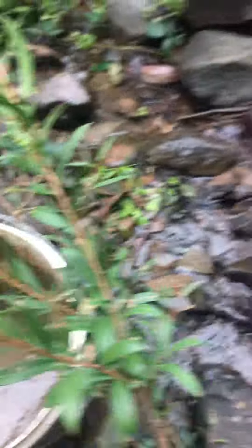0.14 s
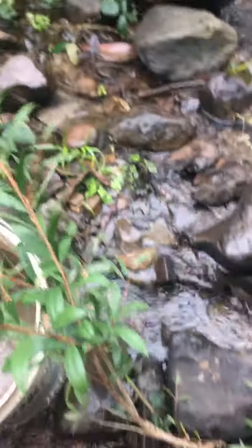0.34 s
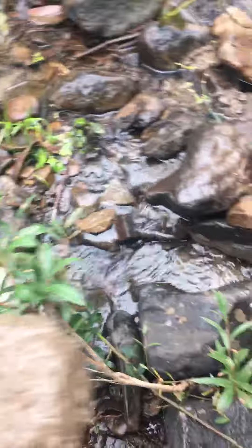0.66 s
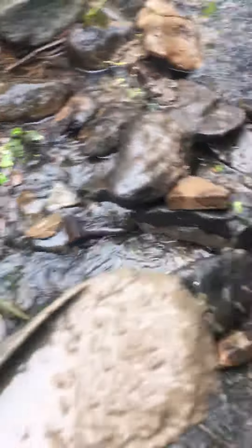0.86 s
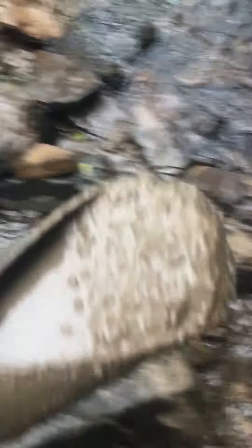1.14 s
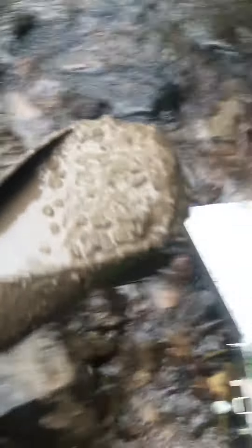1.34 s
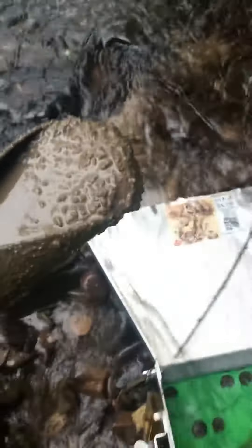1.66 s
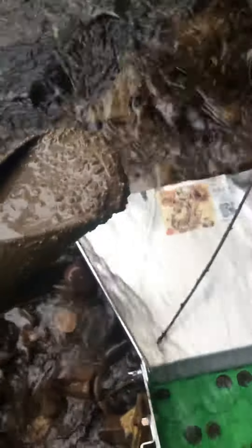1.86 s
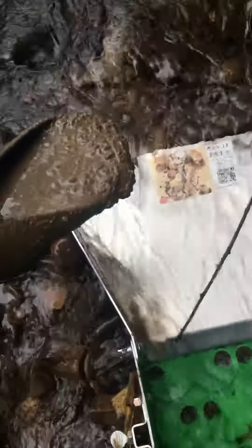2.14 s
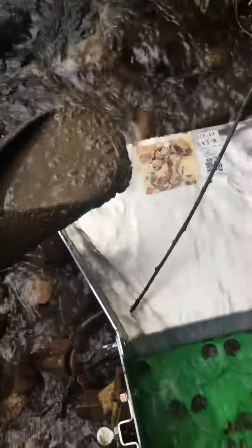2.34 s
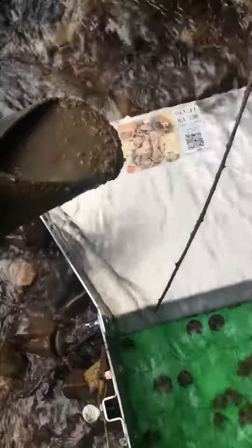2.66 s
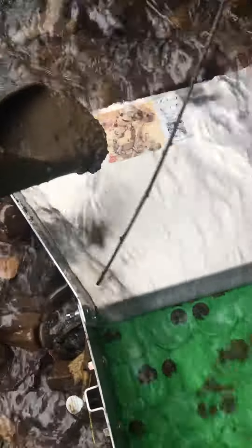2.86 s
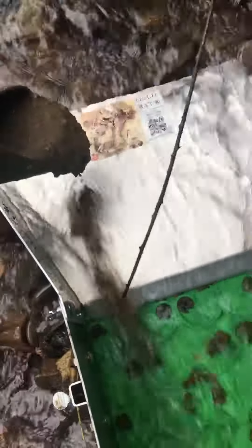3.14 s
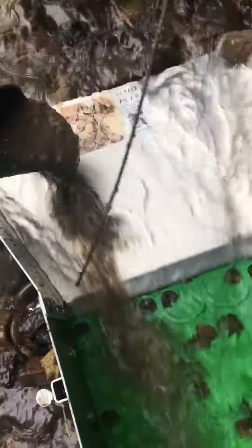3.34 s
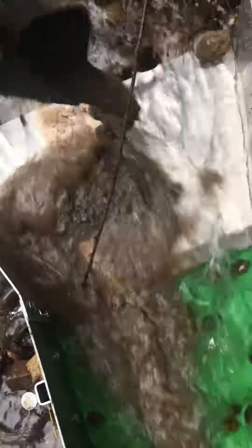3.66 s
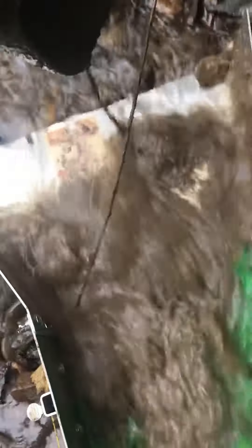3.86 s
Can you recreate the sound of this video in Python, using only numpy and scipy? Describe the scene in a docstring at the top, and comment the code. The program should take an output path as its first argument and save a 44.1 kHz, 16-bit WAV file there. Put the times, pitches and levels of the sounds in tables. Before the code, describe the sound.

A shallow stream gurgles and hisses over rocks outdoors, with bubbles and sharp droplets, growing louder as the close microphone nears a sluice tray; near the end wet gravel splatters and knocks onto it.

```python
"""By a rocky stream, close up: a rush of water, louder as the microphone nears a sluice tray.
Shaped noise makes the rush and hiss, fading rising tones the bubbles, short noise bursts the droplets.
A low rumble and a wavering low tone lie underneath. The hollow tray hums: noise through resonances.
Near the end wet gravel is tipped onto the tray: it splatters, hisses and knocks it."""
import sys
import numpy as np
from scipy import signal
from scipy.fft import rfft, irfft, next_fast_len
from scipy.io import wavfile
from scipy.ndimage import uniform_filter1d, map_coordinates

SR = 44100
rng = np.random.default_rng(int(sys.argv[2]) if len(sys.argv) > 2 else 0)


def generate_wav(sig):
    """Save sig (samples, or channels by samples) to the path in sys.argv[1] as 16-bit PCM at SR."""
    pcm = np.round(np.clip(np.atleast_2d(sig).T, -1, 1) * 32767).astype(np.int16)
    wavfile.write(sys.argv[1], SR, pcm)


def decibels_to_gain(level_db):
    """Convert a level in decibels to a linear amplitude gain (20 dB per decade)."""
    exponent = np.asarray(level_db, float) / 20
    return 10 ** exponent


N = 176400  # samples: 4 s

# Strength of the stream, before each layer's own offset:
# (time [s], gurgle level [dB], spray level [dB])
STREAM_LEVELS = [(0, -49.5, -52.5), (2.5, -45.5, -47.5), (3.3, -46.5, -44), (4, -42, -36.5)]
# Tone colour of the water rushing over stones: (frequency [Hz], relative power per Hz [dB])
GURGLE_SPECTRUM = [(180, -55), (300, -17), (405, -1.5), (502, -19), (613, -1.5), (1380, -3.5), (2860, -5),
                   (4910, -15), (6000, -47), (7800, -84)]
# Tone colour of the fine hiss: (frequency [Hz], relative power per Hz [dB])
SPRAY_SPECTRUM = [(1760, -9.5), (3000, 1.5), (4940, -10), (5990, 2.5), (7480, -4.5), (10400, -4),
                  (14600, 3.5), (16000, -3), (16500, -43)]
# Tone colour of the low rumble: (frequency [Hz], relative power per Hz [dB])
RUMBLE_SPECTRUM = [(20, -43), (36, -8), (75, 0.5), (92, -1), (113, -9.5), (140, -10), (200, -14.5),
                   (260, -55), (440, -120)]
# Hollow resonances of the tray, each passed through twice: (frequency [Hz], width of one pass [Hz])
TRAY_RESONANCES = [(240, 56.4), (500, 72)]
# Hum from water drumming on the tray: (time [s], lower resonance [dB], upper resonance [dB])
TRAY_HUM_LEVELS = [(0, -63.5, -64.5), (1.6, -59, -52.5), (3.15, -60.5, -56.5), (3.25, -67, -43),
                   (3.36, -58, -56), (3.64, -57.5, -51.5), (3.71, -42.5, -66), (3.765, -71, -57),
                   (3.79, -43, -57), (3.9, -48.5, -52.5), (3.94, -57, -57)]
# Gravel blows: (time [s], click into lower resonance [dB], click into upper resonance [dB])
GRAVEL_KNOCKS = [(3.505, 7, 14.5), (3.783, 16.5, -18)]
# The clearest near bubbles: (time [s], level [dB], starting pitch [Hz], cycles per 20 dB of fading [-])
NEAR_BUBBLES = [(0.2125, -24, 1450, 11.5), (0.253, -23.5, 1230, 5.5), (0.3725, -26, 2070, 9.5),
                (0.436, -38, 1275, 18), (0.46, -31, 1180, 12), (0.679, -29.5, 2430, 12.5),
                (0.716, -30, 4220, 9), (0.818, -31.5, 1860, 16), (0.877, -34, 3810, 26),
                (0.916, -36, 2620, 16), (1.3, -29, 805, 6.5), (1.419, -33.5, 2300, 17),
                (1.555, -31.5, 2330, 17), (1.683, -35.5, 4000, 18), (1.817, -36, 1070, 25),
                (2.047, -32.5, 2760, 23), (2.261, -25, 980, 6.5), (2.294, -34, 904, 9),
                (2.342, -28, 1436, 12.5), (2.396, -26.5, 1030, 5.5), (2.625, -30.5, 5220, 25),
                (2.637, -26.5, 2650, 13.5), (2.668, -36, 1270, 13), (2.698, -40, 1033, 39),
                (2.723, -33, 1407, 27), (2.773, -33, 1030, 11), (2.837, -30.5, 4600, 18),
                (2.913, -31, 2170, 19), (2.958, -25.5, 3540, 10), (2.979, -35.5, 1350, 10),
                (2.995, -30, 1060, 14.5), (3.049, -30.5, 1515, 13), (3.182, -35, 3670, 29),
                (3.202, -36.5, 1390, 25), (3.321, -29.5, 2270, 17), (3.364, -33.5, 3310, 23),
                (3.449, -30.5, 970, 6), (3.495, -7, 2070, 7), (3.505, -24, 956, 8.5), (3.712, -19, 2590, 9),
                (3.996, -26, 3740, 17), (3.966, -28, 2170, 22)]
# The loudest droplets: (time [s], peak [dB], centre frequency [Hz])
NEAR_SPLATS = [(0.0266, -26.5, 14600), (0.0753, -22.5, 7200), (0.2113, -23, 6650), (0.2, -31, 5300),
               (0.2915, -31.5, 4640), (0.331, -30, 6600), (0.505, -29, 15400), (0.612, -25.5, 9300),
               (0.7662, -24, 14800), (0.817, -6, 14400), (0.9183, -27, 12600), (0.9311, -16.5, 10100),
               (1.074, -18, 13100), (1.12, -26.5, 4370), (1.3096, -26, 9200), (1.396, -33, 5800),
               (1.3267, -18.5, 9800), (1.458, -29, 8800), (1.4964, -23, 9300), (1.5564, -31, 12600),
               (1.6127, -21, 8750), (1.628, -14.5, 14800), (1.679, -24, 9300), (1.7144, -24, 5670),
               (1.8065, -25, 13200), (1.8348, -16, 12800), (1.857, -25, 11100), (1.8866, -23, 12700),
               (2.0847, -20, 15200), (2.177, -18, 14600), (2.2332, -24, 4900), (2.301, -24, 4200),
               (2.3356, -25, 15100), (2.4917, -24, 15300), (2.5701, -16.5, 15100), (2.6264, -13.5, 11400),
               (2.646, -22, 5470), (2.7, -22, 8200), (2.7196, -18, 4840), (2.7673, -22, 15000),
               (2.9253, -17, 11800), (3.0799, -23, 14600), (3.1276, -19, 14700), (3.144, -20, 14300),
               (3.1942, -12, 8900), (3.2161, -15, 12100), (3.262, -15.5, 15100), (3.3022, -26, 10000),
               (3.344, -14, 13900), (3.4333, -16.5, 10700), (3.474, -10, 13400), (3.505, -4.5, 6700),
               (3.5402, -8.5, 12800), (3.6106, -17.5, 7150), (3.6591, -28, 14700), (3.7801, -4, 11600),
               (3.7874, -14, 15100), (3.807, -10, 13900), (3.819, -9, 9900), (3.851, -14, 15000),
               (3.865, -17.5, 6550), (3.8688, -9, 13300), (3.875, -16, 9100), (3.89, -15, 9450),
               (3.931, -11.5, 9600), (3.9659, -22, 14000), (3.987, -14, 14100)]
# Broad splashes, short slaps of water and one long high fizz:
# (time [s], peak [dB], centre frequency [Hz], time to fade 60 dB [s])
BROAD_SPLASHES = [(0.2117, -26, 2200, 0.022), (0.2537, -28, 1760, 0.0095), (0.3722, -36, 1400, 0.01),
                  (0.622, -29, 13000, 0.26), (1.556, -23.5, 3200, 0.005), (3.506, -24.5, 816, 0.035),
                  (3.968, -28, 2000, 0.033)]
# Slurry landing on the tray, before each layer's own changes: (time [s], level [dB])
POUR_LEVELS = [(3.15, -53), (3.3, -55), (3.46, -44), (3.5, -33.5), (3.56, -39), (3.6, -43.5), (3.77, -43),
               (3.785, -33.5), (3.825, -32), (3.845, -37), (3.879, -26.5), (3.91, -54), (4.0, -41)]


def unit(x):
    """Scales a sound to an average (rms) strength of 1."""
    return x / np.sqrt(np.mean(x ** 2) + 1e-20)


def along(points, hz):
    """Reads a curve of (frequency, value) points on a log frequency axis."""
    f, value = np.transpose(points)
    return np.interp(np.log(hz + 1), np.log(f + 1), value)


def curves(rows):
    """Gives one value per sample for each column after the time."""
    s, *columns = np.transpose(rows)
    return [np.interp(np.arange(N) / SR, s, column) for column in columns]


def wobble(rate):
    """Draws a smooth random curve with rate random points a second."""
    points = rng.standard_normal(int(N * rate / SR) + 400)
    return map_coordinates(points, [np.arange(N) * rate / SR])


def filtered(x, response):
    """Multiplies the spectrum of x by a response, a function of frequency."""
    m = next_fast_len(N + SR // 2)  # room for ringing after the end
    return irfft(rfft(x, m) * response(np.fft.rfftfreq(m, 1 / SR)), m)[..., :N]


def rush(spectrum, patchy_db, wide=6, long=6):
    """Makes noise of rms 1 with patches of random gain, wide in frequency and long in time."""
    z = signal.stft(rng.standard_normal(N), nperseg=256)[2]
    patches = uniform_filter1d(rng.standard_normal(z.shape), size=wide, axis=0)
    patches = uniform_filter1d(patches, size=long, axis=1)
    x = signal.istft(z * decibels_to_gain(patchy_db * unit(patches)), nperseg=256)[1][:N]
    return unit(filtered(x, lambda hz: decibels_to_gain(along(spectrum, hz))))


def laid(s, grains):
    """Adds up rows of short sounds at their start times."""
    at = np.round(s * SR).astype(int)[:, None] + np.arange(grains.shape[1])
    return np.bincount(at.ravel(), grains.ravel(), N + SR)[:N]


def scatter(count, level_db, spread_db):
    """Draws random moments, levels above a curve with a few far louder, and two normal draws each."""
    u, v = rng.random((count, 2)), rng.standard_normal((count, 2))
    base_db = level_db[(u[:, 0] * N).astype(int)]
    return u[:, 0] * N / SR, base_db - spread_db * np.log(1 - .97 * u[:, 1]), v.T


def bubbles(s, db, hz, cycles):
    """Makes bubbles as fading sine tones that start softly and rise in pitch."""
    turns = hz[:, None] * np.arange(1536) / SR
    life = turns / np.abs(cycles)[:, None]  # 1 once faded by 20 dB
    soft_start = 1 - np.exp(-turns / 3.98)  # in cycles
    shape = decibels_to_gain(db[:, None] - 20 * life) * soft_start * 1.89
    rise = 1 + 0.045 * np.minimum(life, 3) / 2  # pitch is up 4.5 % at life 1
    return laid(s, shape * np.sin(2 * np.pi * turns * rise))


def clusters(s, db, hz, cycles, count):
    """Follows each bubble with count bubbles of nearby pitch, always 4.5 to 13.5 dB weaker."""
    u = rng.random((len(s), count, 3))
    later = s[:, None] + .014 * u[..., 0]  # within 14 ms
    pitch = hz[:, None] * 2 ** (.55 * (2 * u[..., 1] - 1))  # up to 0.55 octave either way
    follower_db = db[:, None] - 9 * (.5 + u[..., 2])
    followers = bubbles(later.ravel(), follower_db.ravel(), pitch.ravel(), np.repeat(cycles, count))
    return bubbles(s, db, hz, cycles) + followers


def splats(s, db, hz, t60, octaves=0.3, size=2048):
    """Makes splashes as sudden noise bursts: a snap, a body and a weaker fizzing tail."""
    f, t = np.fft.rfftfreq(size, 1 / SR) + 1, np.arange(size) / SR
    centre = hz[:, None]
    band = np.exp(-.5 * (np.log2(f / centre) / octaves) ** 2)
    band = band + 0.15 * f / (f + centre / 4)  # broadband share
    band = band + 0.17 / (1 + (centre / f) ** 10)  # share above the centre
    noise = irfft(rfft(rng.standard_normal((len(s), size))) * band)
    body_db = -60 * t / np.abs(t60 + 0 * s)[:, None]
    snap = decibels_to_gain(8.5 - 60 * t / 0.00043)
    tail = decibels_to_gain(-8 + body_db / 7.7)  # fades 7.7 times slower than the body
    burst = noise * (snap + decibels_to_gain(body_db) + tail)
    burst = burst * (1 - np.exp(-t / .0001)) * (1 - t / t[-1])  # no clicks at the ends
    return laid(s, decibels_to_gain(db[:, None]) * burst / np.abs(burst).max(1)[:, None])


def gurgle(level_db):
    """Water over stones: far rush, clusters of small bubbles, clear near ones and broad splashes."""
    far = decibels_to_gain(level_db - 3.5 + .8 * wobble(6)) * rush(GURGLE_SPECTRUM, patchy_db=3.5, wide=4, long=4)
    s, db, (a, b) = scatter(count=1000, level_db=level_db + 2.5, spread_db=3.0)
    hz = 450 + 1800 * np.exp(.6 * np.clip(a, -3, 1.6))
    small = clusters(s, db, hz, 10.5 * np.exp(0.35 * b), count=2)
    near = clusters(*np.transpose(NEAR_BUBBLES), count=2)
    splashes = splats(*np.transpose(BROAD_SPLASHES), octaves=1.0, size=6144)
    return far + small + near + splashes


def spray(level_db):
    """Flying water: fine noise hiss, many small droplets and the loudest splats."""
    hiss = decibels_to_gain(level_db - 3 + 1.2 * wobble(70)) * rush(SPRAY_SPECTRUM, patchy_db=1.5, wide=20, long=2)
    s, db, (a, b) = scatter(count=1000, level_db=level_db + 8.0, spread_db=3.0)
    hz = np.clip(9500 * np.exp(0.55 * a), 3500, 15500)
    small = splats(s, db, hz, 0.0045 * np.exp(.5 * b), octaves=0.18, size=1024)
    near = splats(*np.transpose(NEAR_SPLATS), t60=0.0022)
    return hiss + small + near


def rumble():
    """A low rumble: deep noise with louder and softer patches."""
    return decibels_to_gain(-61) * rush(RUMBLE_SPECTRUM, patchy_db=2.5)


def resonance(hz, width):
    """Gives the response of a hollow resonance: a band round one note, passed through twice."""
    return lambda f: (1j * f * width / (hz * hz - f * f + 1j * f * width)) ** 2


def tray():
    """Water noise keeps the hollow tray humming on unsteady notes; gravel clicks make it ring."""
    s, *blows = np.transpose(GRAVEL_KNOCKS)
    out = 0
    for (hz, width), level_db, blow_db in zip(TRAY_RESONANCES, curves(TRAY_HUM_LEVELS), blows):
        drone = 0
        # Two notes, 5.7 % below and above, swell separately so the pitch seems to wander.
        for shift in (-0.057, 0.057):
            drumming = rng.standard_normal(N) * decibels_to_gain(5.4 * wobble(30))
            drone = drone + filtered(drumming, resonance(hz * (1 + shift), width))
        knocks = filtered(laid(s, decibels_to_gain(blow_db)[:, None]), resonance(hz, width))
        out = out + decibels_to_gain(level_db) * unit(drone) + knocks
    return out


def hum():
    """A low sine tone round 82 Hz whose pitch and level waver."""
    hz = 82 + 3 * wobble(8)
    level_db = -65.5 + 3.3 * wobble(7.15)
    return decibels_to_gain(level_db) * np.sin(2 * np.pi * np.cumsum(hz) / SR)


def slurry(pour_db):
    """Wet gravel landing: a crunchy noise hiss, tangled bubbling and dense spatter."""
    hiss = decibels_to_gain(pour_db + 2.2 * wobble(90)) * rush(SPRAY_SPECTRUM, patchy_db=2.5, wide=20, long=2)
    u = rng.random((260, 4))  # one row a splat
    start, end = POUR_LEVELS[0][0], POUR_LEVELS[-1][0]
    s = start + u[:, 0] * (end - start)
    db = pour_db[(s * SR).astype(int) - 1] + 14 * u[:, 1]
    slosh = clusters(s, db - 12, 600 * 6 ** u[:, 3], 8 + 0 * s, count=1)
    spatter = splats(s, db, 6500 + 8500 * u[:, 2], t60=0.0054, size=1024)
    return hiss + slosh + spatter


def scene():
    """Mixes all layers to one channel; gurgle and spray share one flutter in level."""
    flutter_db = .9 * wobble(14)
    gurgle_db, spray_db = (level_db + flutter_db for level_db in curves(STREAM_LEVELS))
    quiet_before = [(POUR_LEVELS[0][0] - .2, -90)]
    pour_db, = curves(quiet_before + POUR_LEVELS)
    water = gurgle(gurgle_db) + spray(spray_db)
    mix = water + rumble() + tray() + hum() + slurry(pour_db)
    return mix[None]


def roll_off(x):
    """The treble ends steeply here."""
    return signal.sosfilt(signal.butter(12, 16970, fs=SR, output="sos"), x)


def record(dry):
    """Limits the band as the recorder does: nothing from 15950 Hz up gets through."""
    mix = filtered(dry, lambda hz: hz < 15950)
    return roll_off(mix)


dry = scene()
out = record(dry)
generate_wav(out)
```